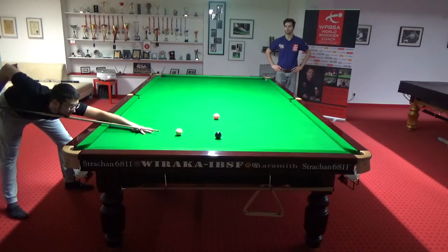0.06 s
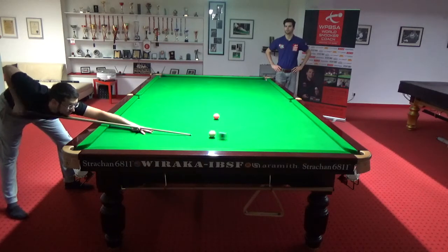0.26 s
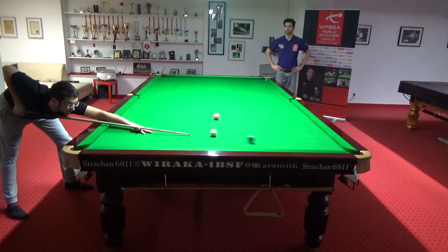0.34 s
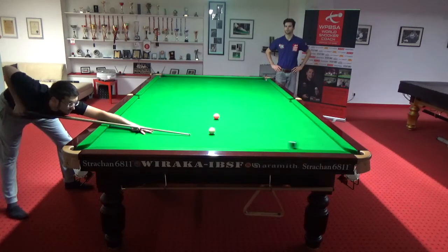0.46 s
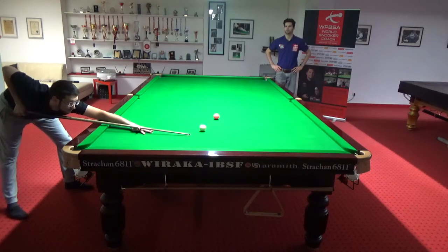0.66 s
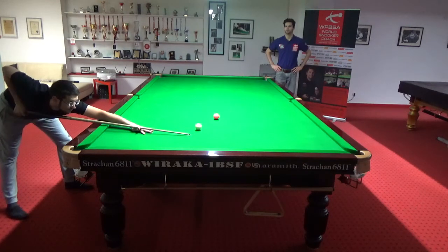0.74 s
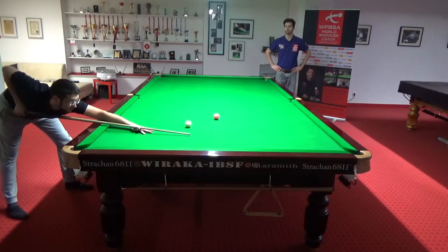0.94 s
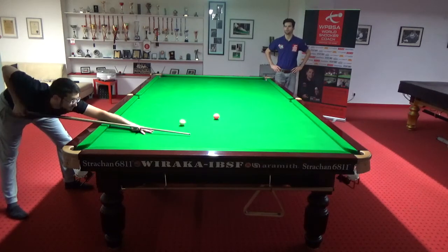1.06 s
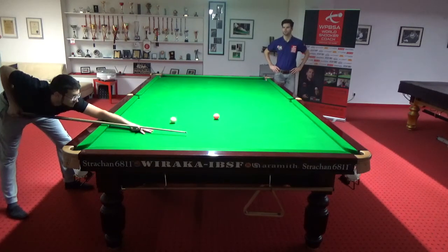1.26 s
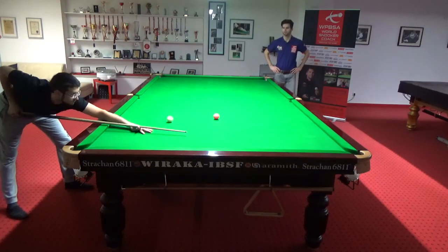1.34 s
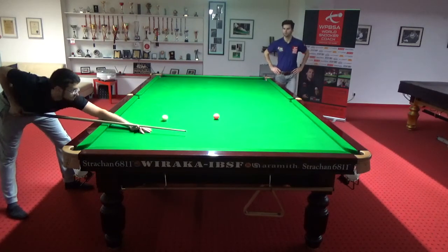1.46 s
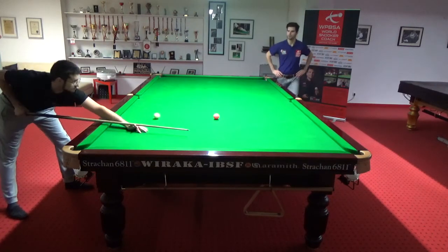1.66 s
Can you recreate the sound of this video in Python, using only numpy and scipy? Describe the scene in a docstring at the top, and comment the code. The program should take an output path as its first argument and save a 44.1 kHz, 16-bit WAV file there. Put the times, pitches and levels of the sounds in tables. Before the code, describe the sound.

A snooker shot: cue cracks, balls clack, and one rattles into a pocket.

```python
"""A snooker shot in a quiet hall, over a low hum and a faint hiss. The cue cracks against the white ball
and its shaft rings. The white clacks into the black, which rumbles over the slate, thuds into a corner
pocket, rattles down the rail below and knocks against the balls lying there.
Every blow dies away in the hall, and the hiss swells at the end."""
import sys
import numpy as np
from scipy import signal
from scipy.fft import rfft, irfft
from scipy.io import wavfile
from scipy.ndimage import uniform_filter1d, minimum_filter1d

SR = 44100
rng = np.random.default_rng(int(sys.argv[2]) if len(sys.argv) > 2 else 0)


def log_audio(samples):
    """Write samples as a 16-bit WAV file to the path given in sys.argv[1]."""
    # one column per channel
    frames = np.atleast_2d(samples).T
    # limit to full scale, then quantise
    limited = np.clip(frames, -1, 1)
    pcm = np.round(limited * 32767).astype(np.int16)
    wavfile.write(sys.argv[1], SR, pcm)


N = 74970
T = np.arange(N) / SR
# A "colour" lists how strong each frequency is. A "t60" is the time a sound takes to fade by 60 dB.
BALL_SCATTER_RISE_S, BALL_SCATTER_T60_S = 0.00083, 0.035   # reflections close by when ball hits ball


def from_db(db):
    """Turn decibels into a factor to multiply by."""
    return 10 ** (np.asarray(db) / 20)


def rms_one(x):
    """Scale a sound so that its average power is 1."""
    return x / np.sqrt(np.mean(x ** 2) + 1e-20)


def at_hz(points, hz):
    """Read between the rows of a frequency table, giving each octave equal room."""
    f, value = np.transpose(points)
    return np.interp(np.log(np.maximum(hz, 1)), np.log(f), value)


def level(points):
    """A volume curve through rows of t/s, level/dB."""
    return from_db(np.interp(T, *np.transpose(points)))


def tilted(colour, db_per_octave, pivot_hz=4000):
    """The same colour, made brighter (plus) or darker (minus)."""
    return [(hz, db + db_per_octave * np.log2(hz / pivot_hz)) for hz, db in colour]


def delay(x, s):
    """The same sound, s seconds later."""
    lag = int(np.clip(round(s * SR), 0, N - 1))
    return np.concatenate([np.zeros(x.shape[:-1] + (lag,)), x[..., :N - lag]], axis=-1)


def through(x, response):
    """Give a mono sound a stereo pattern of reflections."""
    return signal.fftconvolve(x[None], response, axes=1)[:, :N]


def pulse(colour, size=2048):
    """The shortest click that has this colour, with a peak of 1."""
    hz = np.arange(size // 2 + 1) * SR / size
    cepstrum = irfft(np.log(from_db(at_hz(colour, hz))))
    # folding the second half onto the first packs the energy at the start of the click
    cepstrum[1:size // 2] *= 2
    cepstrum[size // 2 + 1:] = 0
    shape = irfft(np.exp(rfft(cepstrum)))
    return np.pad(shape / np.abs(shape).max(), (0, N - size))


def noise(colour=None):
    """Stereo noise of power 1, nearly the same on the left and right."""
    # stereo width, the opposite (side) part against the shared (mid) part: f/Hz, level/dB
    width = [(60, -16), (250, -21), (600, -15), (1200, -16.5), (2300, -20.5), (5000, -15), (10000, -10.5)]
    hz = np.arange(N // 2 + 1) * SR / N
    mid, side = rfft(rng.standard_normal((2, N)))
    side = side * from_db(at_hz(width, hz))
    gain = 1 if colour is None else from_db(at_hz(colour, hz))
    return rms_one(irfft(np.array([mid + side, mid - side]) * gain, N))


def swell_and_die(rise_s, t60):
    """A volume curve that rises quickly, then fades away."""
    rise = 1 - np.exp(-T / max(rise_s, 1e-5))
    return rise * np.exp(-np.minimum(np.log(1000) * T / t60, 40))


def ring(tones, rise_s):
    """A struck object rings with fading tones; every second one starts the other way round."""
    return sum((-1) ** k * from_db(db) * np.sin(2 * np.pi * hz * T) * swell_and_die(rise_s, t60)
               for k, (hz, db, t60) in enumerate(tones))


def scatter(rise_s, t60):
    """Many quick reflections off the table blur into a short burst, with energy 1."""
    return rms_one(noise() * swell_and_die(rise_s, t60)) / np.sqrt(N)


def hall(rise_s=0.006, t60_share=1, bands=10):
    """The hall's lingering echo, with energy 1; low notes last longer than high ones."""
    # how long the hall rings: f/Hz, t60/s
    fade_times = [(100, 0.66), (300, 0.54), (700, 0.55), (1400, 0.46), (2500, .48), (4500, 0.47),
                  (7000, 0.34), (11000, 0.28)]
    hz, centres = np.arange(N // 2 + 1) * SR / N, np.geomspace(100, 11000, bands)
    spectrum, out = rfft(noise()), 0
    for centre, share in zip(centres, np.eye(bands)):
        band = irfft(spectrum * at_hz(np.transpose([centres, share]), hz), N)
        out = out + band * swell_and_die(rise_s, t60_share * at_hz(fade_times, centre))
    return rms_one(out) / np.sqrt(N)


def background():
    """Steady room air, and a faint hiss that swells just before the stroke and again near the end."""
    # colour of the room air: f/Hz, level/dB
    air_colour = [(25, -25), (54, -15), (70, -14), (100, 0.5), (125, -2.5), (330, -13.5), (500, -15),
                  (1300, -18.5), (1700, -21.5), (11000, -28.5)]
    # volume of the hiss: t/s, level/dB
    hiss_levels = [(0, -62), (0.12, -70), (0.18, -47), (0.3, -55), (0.65, -68), (1.25, -52), (1.45, -56),
                   (1.58, -50.5), (1.7, -47)]
    # colour of the hiss: f/Hz, level/dB
    hiss_colour = [(100, 12), (400, 2), (1000, 1.5), (3000, -1), (6500, -2), (11000, -9)]
    return from_db(-53) * noise(air_colour) + level(hiss_levels) * noise(hiss_colour)


def hum(hz=100.3):
    """One faint, low, steady tone."""
    return from_db(-51) * np.sin(2 * np.pi * hz * T)


def roll():
    """The balls rumble as they roll over the slate."""
    # volume of the rumble: t/s, level/dB
    rumble_levels = [(0, -68), (0.19, -57.5), (0.23, -40.5), (0.29, -46), (0.38, -40), (0.55, -47),
                     (0.65, -51), (0.75, -39), (0.95, -44), (1.17, -42.5), (1.35, -51.5), (1.7, -64)]
    # colour of the rumble: f/Hz, level/dB
    rumble_colour = [(25, -30), (52, 2.5), (72, -3), (100, 6), (150, -8.5), (220, -2), (320, -7.5),
                     (500, -24), (1200, -21), (4000, -49)]
    return level(rumble_levels) * noise(rumble_colour)


def thuds():
    """The ball bumps the pocket's jaws and leather, which sets the table's frame booming."""
    # the soft bumps: t/s, level/dB
    bumps = [(0.682, -31), (0.693, -29), (0.706, -31), (0.752, -27), (0.846, -36), (1.13, -35)]
    # ringing tones of the frame: f/Hz, level/dB, t60/s
    frame_tones = [(86.3, -3.5, 0.14), (100.5, -2.5, .16), (127.4, -8, 0.54), (170, -7, 0.14),
                   (203, -10.5, 0.14), (239, -8.5, 0.21), (304, -14, 0.19), (416, -19, 0.19)]
    boom = ring(frame_tones, rise_s=0.003)
    blows = sum(from_db(db) * delay(boom, s) for s, db in bumps)
    return blows + from_db(-12.5) * through(blows, hall())


def rattles():
    """The ball hits the pocket's fittings: bright snaps, heard mostly as reflections, and a faint ring."""
    # hits on the pocket's frame and rail: t/s, level/dB, treble tilt/(dB per octave)
    hits = [(0.7059, -16, -3.5), (0.7489, -37, -12.5), (0.7897, -2.5, 0), (0.865, -16, -2),
            (0.9098, -13, 0), (0.9644, -8, 2), (1.0381, -19, -0.5), (1.055, -12, 1), (1.0623, -10.5, 1.5)]
    # colour of a snap before its tilt: f/Hz, level/dB
    snap_colour = [(88, -36), (150, -4), (231, -5), (1120, -6), (1340, -8.5), (1760, -2), (2220, -7.5),
                   (3610, -5), (5080, -5), (5560, -0.5), (11000, -12.5), (14300, -51), (22000, -120)]
    # ringing tones of the pocket's frame and rail: f/Hz, level/dB against the snap, t60/s
    rail_tones = [(689, -35.5, 0.17), (753, -35, 0.14), (1780, -40, .17), (3470, -32.5, 0.13),
                  (5630, -44, 0.11), (6650, -36, .16)]
    rail = ring(rail_tones, rise_s=0.0029)
    out, tail = 0, from_db(-2) * hall()
    for s, db, tilt_db in hits:
        snap = pulse(tilted(snap_colour, tilt_db))
        reflected = through(snap, scatter(rise_s=0.002, t60=0.11) + tail)
        out = out + from_db(db) * delay(from_db(-12) * snap + reflected + rail, s)
    return out


def knocks(colour_pitch_hz=2500):
    """The potted ball knocks against the balls waiting on the rail."""
    # the knocks: t/s, peak level/dB, pitch/Hz, scatter/dB and hall/dB against the click
    hits = [(0.9871, -11.5, 1960, -4, -1.5), (1.054, 0, 2410, -0.5, 0), (1.1334, -14.5, 1560, 3, 1),
            (1.1344, -10.5, 2460, 2.5, -1.5), (1.1631, -17, 1910, 5, 1)]
    # colour of a knock whose pitch is colour_pitch_hz: f/Hz, level/dB
    knock_colour = [(80, -44), (250, -28.5), (550, -15), (1050, -15), (1550, -8.5), (2100, -2),
                    (2900, -1.5), (3400, -5), (4000, -18.5), (6000, -21.5), (11000, -39)]
    out, tail = 0, hall(t60_share=0.86)   # under the table the hall's echo is shorter
    for s, db, hz, near_db, hall_db in hits:
        shifted_colour = [(f * hz / colour_pitch_hz, band_db) for f, band_db in knock_colour]
        click = from_db(db) * pulse(shifted_colour)
        near = from_db(near_db) * scatter(BALL_SCATTER_RISE_S, BALL_SCATTER_T60_S)
        reflected = through(click, near + from_db(hall_db) * tail)
        out = out + delay(click + reflected, s)
    return out


def cue(start_s=0.2003, rise_cycles=4.7):
    """The chalked tip hits the white with a crack and a bright snap, and the shaft rings on."""
    # colour of the crack: f/Hz, level/dB
    crack_colour = [(60, -50), (150, -28), (250, -17), (420, -12.5), (560, -19.5), (750, -14.5),
                    (1200, -13.5), (2000, -10), (2900, -11), (4200, -15.5), (6000, -22.5), (11000, -32.5)]
    # colour of the tip's snap: f/Hz, level/dB
    snap_colour = [(200, -15), (1000, -8), (3500, -5), (6000, -2), (11000, -7)]
    # ringing tones of the shaft: f/Hz, level/dB, t60/s
    shaft_tones = [(396, -20, 0.16), (457, -25.5, 0.32), (673.4, -24, 0.47), (862, -28, 0.54),
                   (1085, -15.5, 0.25), (1309, -16, 0.21), (1600, -21, 0.21), (1930, -15, 0.16),
                   (2130, -34, 0.18), (2470, -19, 0.27), (2550, -26, 0.28), (2865, -4, 0.062),
                   (3310, -34, 0.13), (3540, -18, 0.12), (3990, -29, 0.26)]
    crack = pulse(crack_colour)
    near = from_db(-21.5) * crack + through(crack, scatter(rise_s=0.0041, t60=0.1))
    dark_crack = pulse(tilted(crack_colour, db_per_octave=-1.5))
    far = from_db(-3.5) * through(dark_crack, hall())
    snap = from_db(-4) * through(pulse(snap_colour), scatter(rise_s=0.00054, t60=0.036))
    # low tones take longer to build up
    shaft = sum((-1) ** k * ring([tone], rise_cycles / tone[0]) for k, tone in enumerate(shaft_tones))
    return delay(from_db(8.5) * (snap + near + far) + delay(shaft, 0.003), start_s)


def clack(start_s=0.2853, echo_cutoff_hz=4500):
    """The white hits the black: a hard click, a thin tick, a few duller echoes, then the hall."""
    # colour of the two balls meeting: f/Hz, level/dB
    click_colour = [(60, -41), (200, -19), (400, -23.5), (700, -18), (1000, -10), (1600, -4.5), (2400, 0.5),
                    (3200, -4), (4300, -12), (5600, -30.5), (8000, -33), (11000, -33.5)]
    # colour of the bright tick just after: f/Hz, level/dB
    tick_colour = [(500, -35), (4000, -18), (7500, -1), (10500, -1)]
    # echoes off the lamp, ceiling and walls: delay/s, level/dB
    bounces = [(.0081, 5), (.0178, -2), (.0186, 5), (.0319, 1)]
    click = from_db(-0.5) * pulse(click_colour)
    tick = from_db(-7.5) * delay(pulse(tick_colour), 0.0023)
    dull_click = signal.sosfilt(signal.butter(2, echo_cutoff_hz, fs=SR, output="sos"), click)
    echoes = sum(from_db(db) * delay(dull_click, lag) for lag, db in bounces)
    near = from_db(4.5) * scatter(BALL_SCATTER_RISE_S, BALL_SCATTER_T60_S)
    far = from_db(10.5) * hall(rise_s=0.021)
    reflected = delay(through(click, near + far), 0.003)   # a short gap before the first reflections
    return delay(click + tick + echoes + reflected, start_s)


def scene():
    """The whole shot over the sound of the room; the bass leans to the left."""
    bass = (thuds() + roll() + hum()) * from_db([[1.8], [-1.8]])
    return cue() + clack() + knocks() + rattles() + background() + bass


def record(dry):
    """A fast limiter turns the loudest peaks down, then a filter cuts the highest treble."""
    ceiling, limiter_s, cutoff_hz = 0.82, 0.002, 11050
    span = int(limiter_s * SR)
    needed_gain = np.minimum(1, ceiling / (np.abs(dry).max(axis=0) + 1e-9))
    smooth_gain = uniform_filter1d(minimum_filter1d(needed_gain, span), span)
    treble_cut = signal.ellip(10, .2, 75, cutoff_hz, fs=SR, output="sos")
    return signal.sosfilt(treble_cut, smooth_gain * dry)


dry = scene()
out = record(dry)
log_audio(out)
```